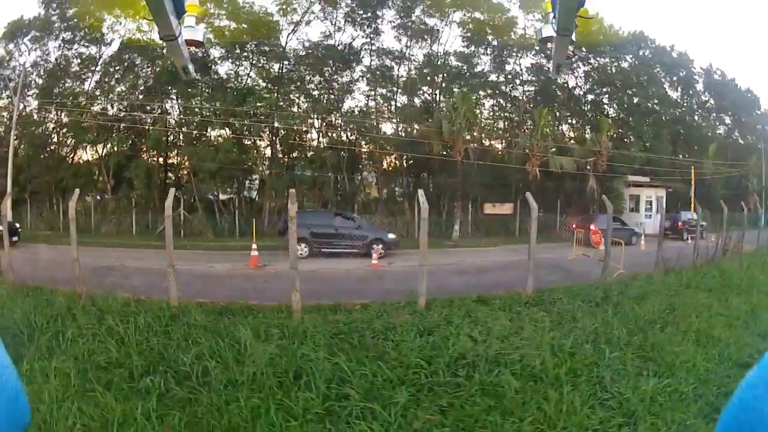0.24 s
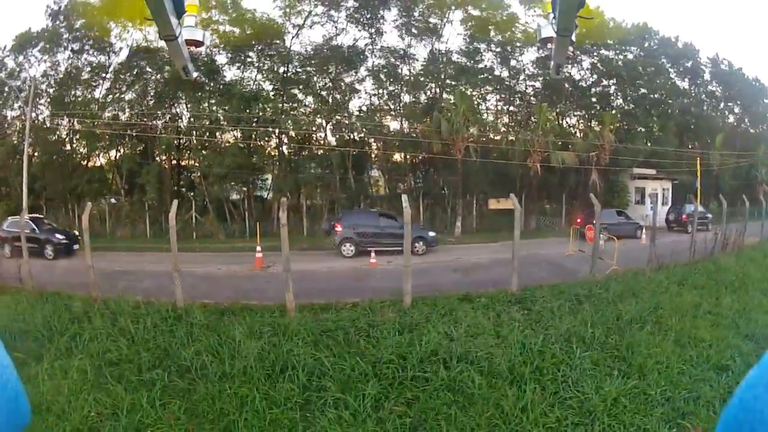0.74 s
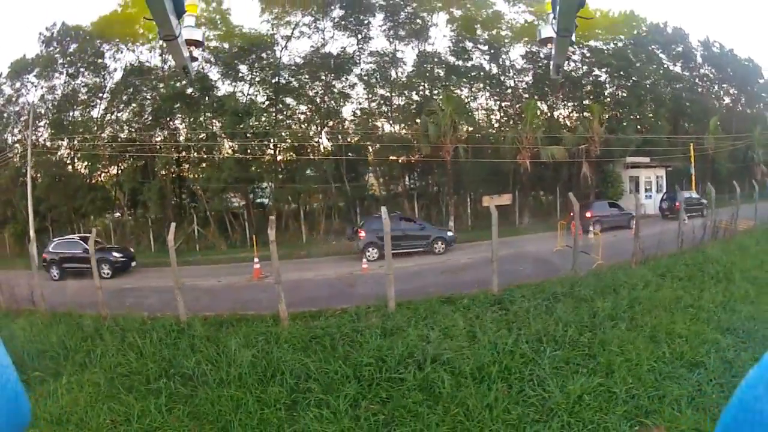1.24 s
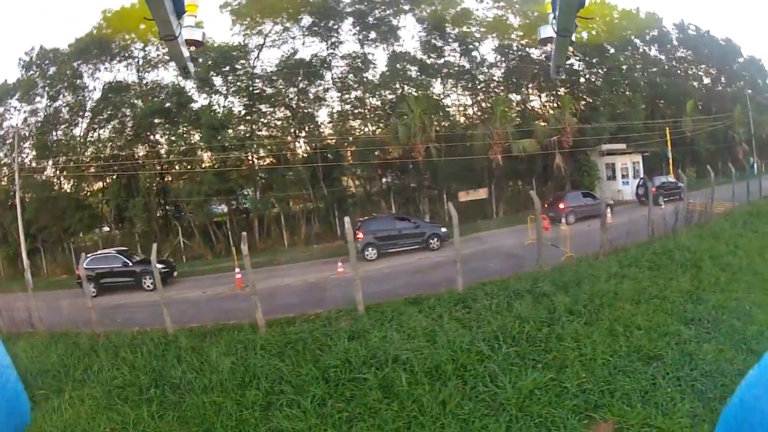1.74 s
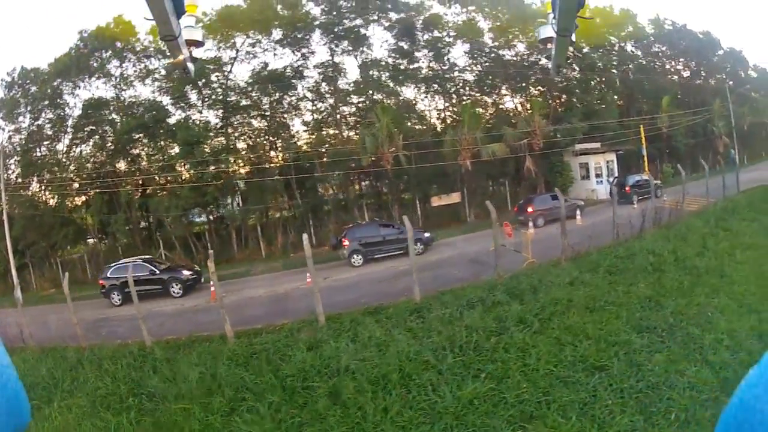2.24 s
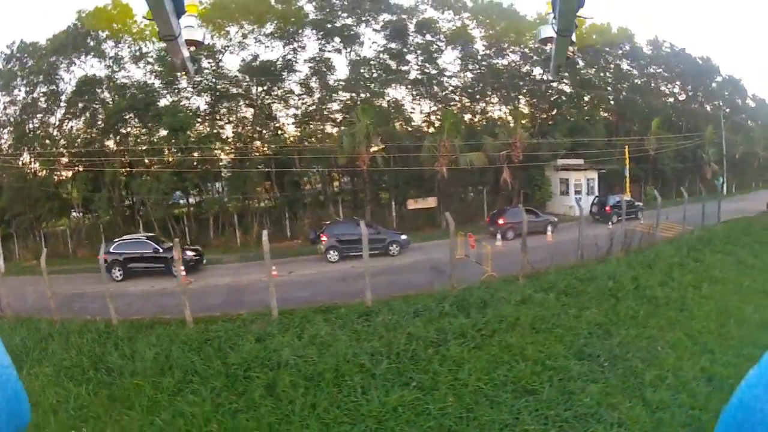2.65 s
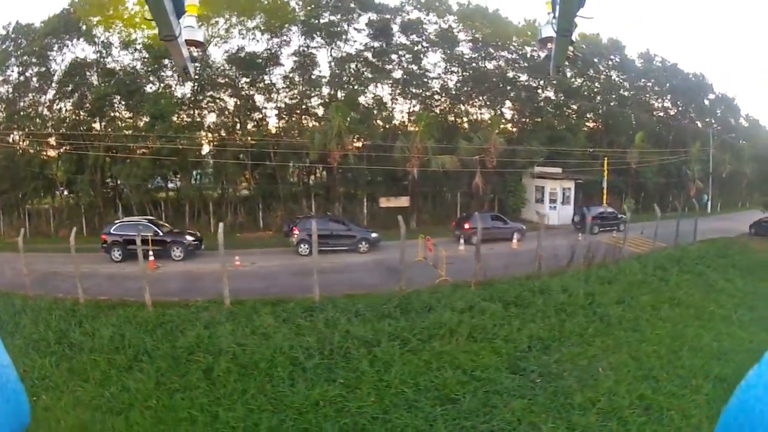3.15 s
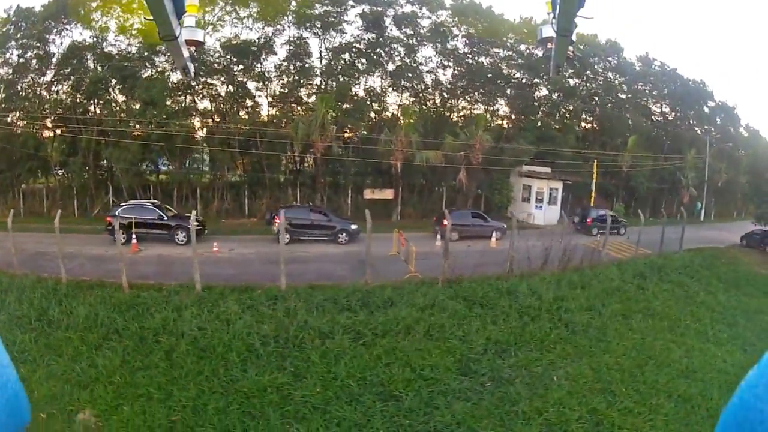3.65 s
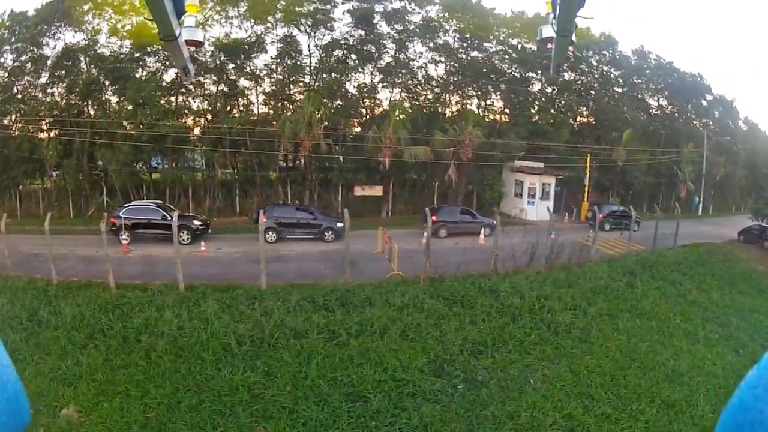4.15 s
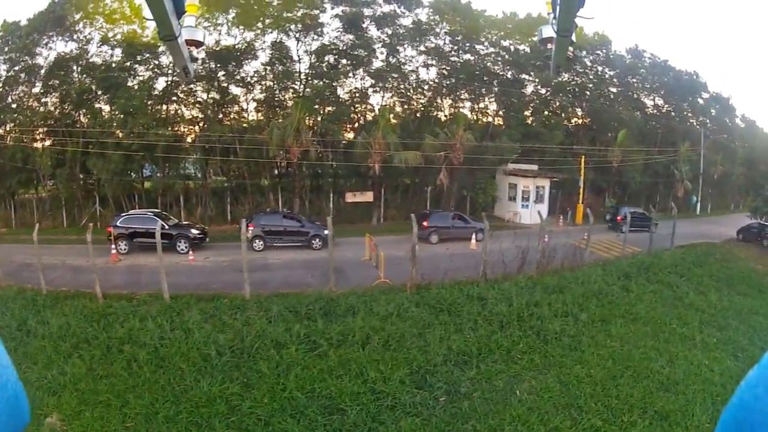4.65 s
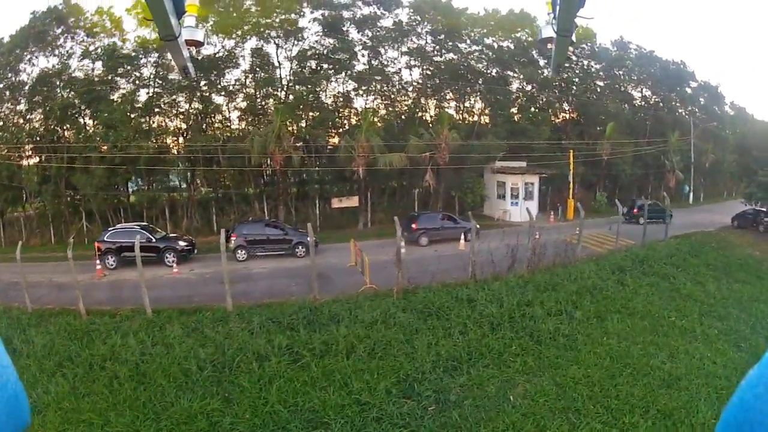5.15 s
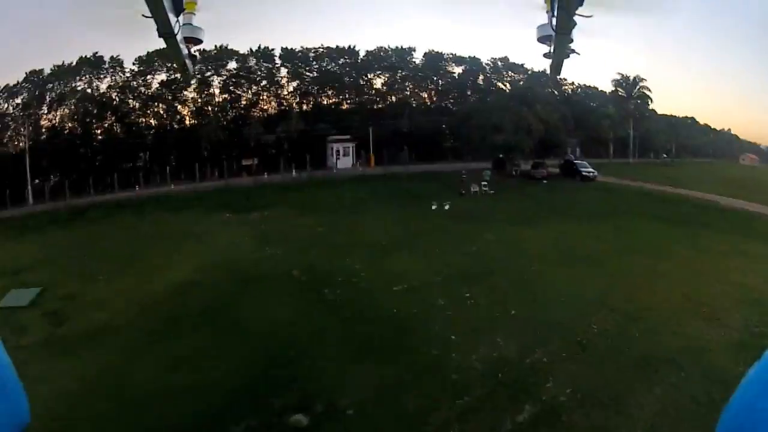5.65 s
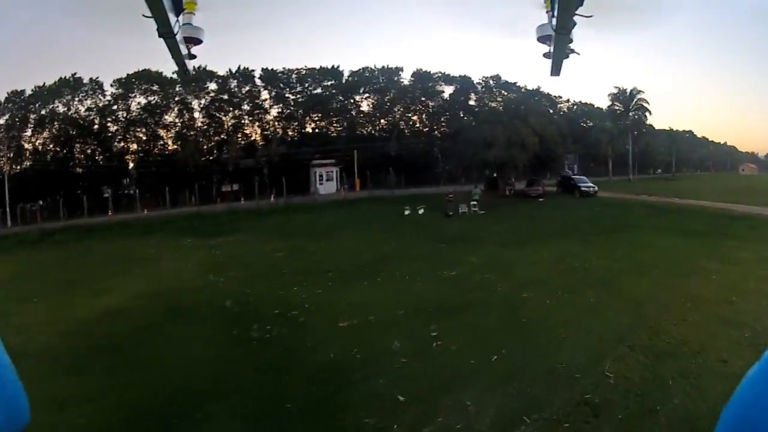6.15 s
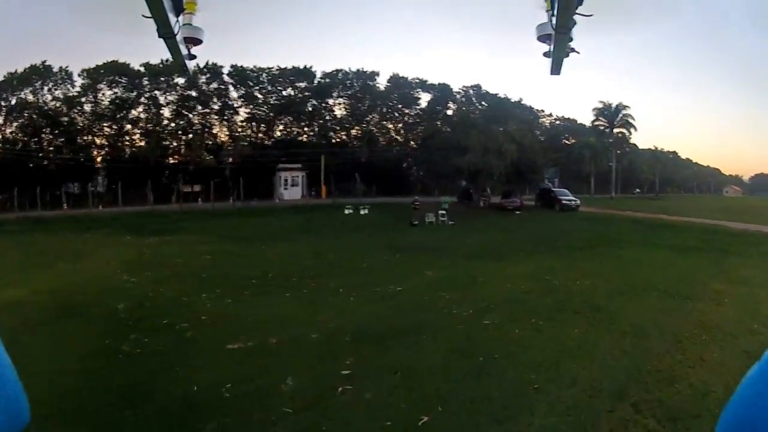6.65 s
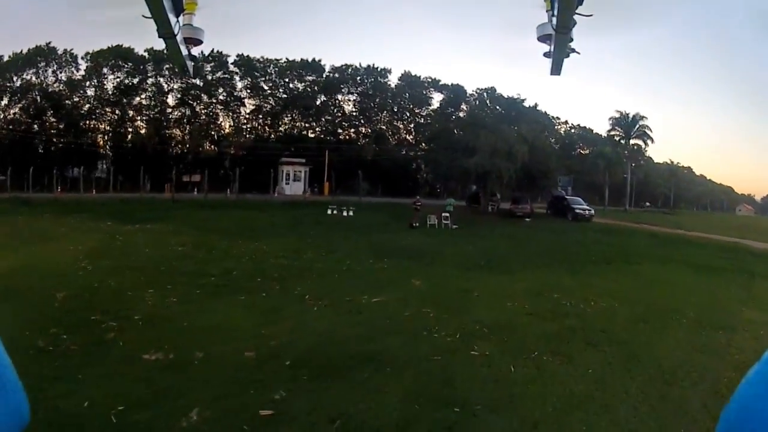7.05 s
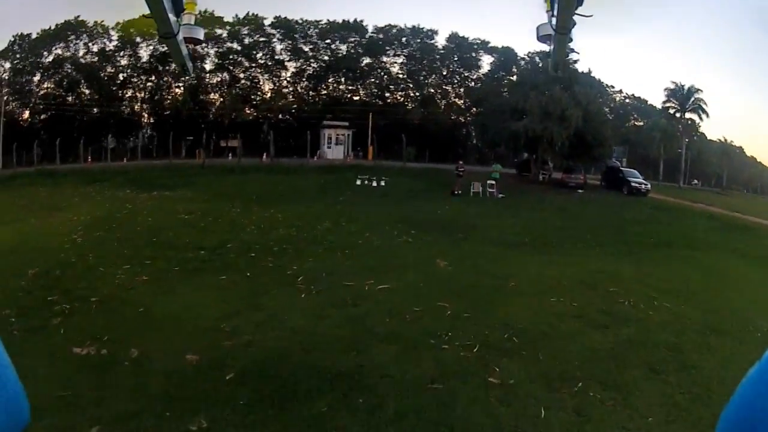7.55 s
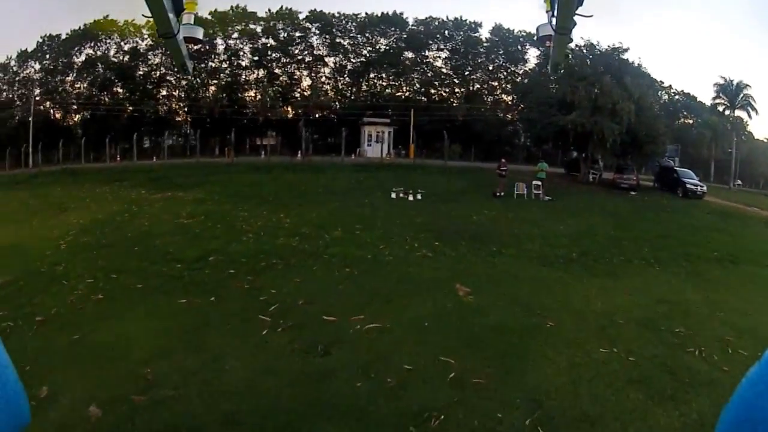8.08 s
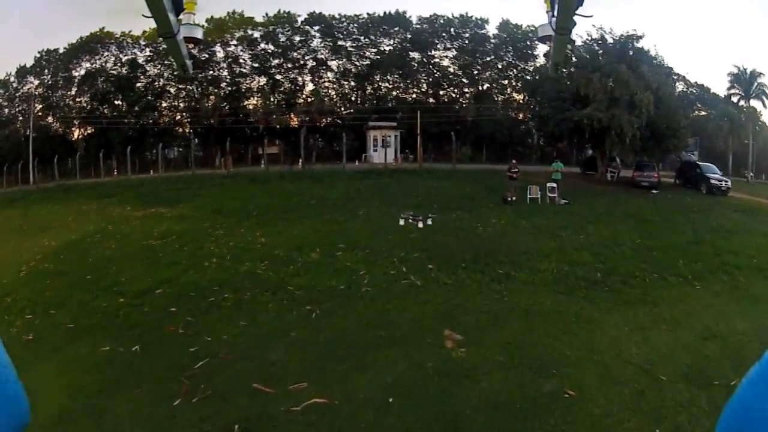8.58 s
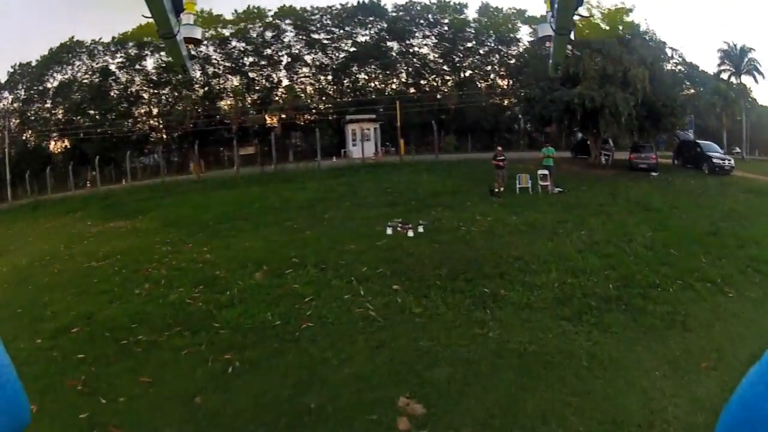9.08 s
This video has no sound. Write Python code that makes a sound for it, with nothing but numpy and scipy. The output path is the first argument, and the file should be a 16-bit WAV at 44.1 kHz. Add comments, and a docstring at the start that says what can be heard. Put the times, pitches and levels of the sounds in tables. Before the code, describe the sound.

Throughout about nine seconds, a camera hanging under a six-rotor drone hears its motors and propellers at close range, with no echo. Low hums around 120 to 175 Hz, with blade tones an octave higher, drift separately and beat in a restless, throbbing drone. Over them lies a gritty, fizzy buzz from the bearings, arms, camera case and small parts; faint wind rumble and hiss lie beneath. The buzz swells slightly near 1.3 and 5.2 s. Small bright ticks come around 0.6, 1.7 and 2.5 s, and dull low thumps near 1.5 and 2.7 s. At about 5.6 s a click marks an abrupt cut to another flight, whose case buzz is softer and rotor pitches spread differently. Thumps follow at 5.7, 6.0, 6.4, 6.9, 7.1, 7.5, 8.2 and 9.2 s, with a tick near 8.9 s. The level stays dense, compressed and slightly clipped, ending while still flying.

```python
"""A beating six-voice rotor hum under a fizzy buzz: a drone hovers over a field, heard from its slung camera.
Two flights follow each other. Each rotor hums at shaft and blade rate; trims shift the speeds, so they beat.
Bearing buzz and blade wash ring arms, camera case and small parts; wind noise, thumps and clicks lie beneath.
The camera levels, clips and holds its samples, which adds the fizz on top."""
import sys
import numpy as np
from scipy import signal
from scipy.fft import rfft, irfft, next_fast_len
from scipy.io import wavfile
from scipy.ndimage import uniform_filter1d

SR = 44100
rng = np.random.default_rng(int(sys.argv[2]) if len(sys.argv) > 2 else 0)


def waveform_to_disk(signal):
    """Save audio, clipped to [-1, 1], as 16-bit WAV at the path in sys.argv[1]."""
    frames = np.transpose(np.atleast_2d(signal))
    scaled = np.clip(frames, -1, 1) * 32767
    samples = np.round(scaled).astype(np.int16)
    wavfile.write(sys.argv[1], SR, samples)


N = 411012
TIME = np.arange(N) / SR
SECOND_FLIGHT_S = 5.565


def undb(db):
    """dB to amplitude ratio."""
    return 10 ** (np.asarray(db) / 20)


def unit(x):
    """Scale to rms 1."""
    return x / np.sqrt(np.mean(x ** 2))


def by_flight(first, second):
    """One value in the first flight, another in the second."""
    return np.where(TIME < SECOND_FLIGHT_S, first, second)


def curves(table):
    """Columns of a table, joined by straight lines in time."""
    s, *columns = np.transpose(table)
    return [np.interp(TIME, s, column) for column in columns]


def walk(rate_hz):
    """Smooth random wander of rms 1: random steps at rate_hz, averaged twice over one step."""
    step = max(int(SR / rate_hz), 1)
    stairs = np.repeat(rng.standard_normal(N // step + 1), step)
    ramps = uniform_filter1d(stairs, step)
    return unit(uniform_filter1d(ramps, step)[:N])


def sine(angle):
    """Sine at a random start phase."""
    return np.sin(angle + 2 * np.pi * rng.random())


def ring(x, modes):
    """Pass x through steep resonances whose powers add; rms 1."""
    size = next_fast_len(N)
    f = np.arange(size // 2 + 1) * SR / size + 1e-3  # offset avoids 0/0
    power = 0
    for hz, width_hz, db in modes:
        detuning = (f * f - hz * hz) / (f * width_hz)
        power = power + undb(db) ** 2 / (1 + detuning ** 2) ** 2
    return unit(irfft(rfft(x, size) * np.sqrt(power), size)[:N])


RUMBLE_DB, HISS_DB = (-62.5, -54), (-62, -58.5)  # (first flight, second flight)


def wind(churn_db=-39, flicker_db=3.5):
    """Downwash buffets the case and hisses on its edges; churned air fills in around the rotor tones."""
    rumble = ring(rng.standard_normal(N), [(28, 86, -1), (80, 150, 0)]) * undb(by_flight(*RUMBLE_DB))
    hiss_db = by_flight(*HISS_DB) + flicker_db * walk(80)
    hiss = ring(rng.standard_normal(N), [(4870, 3300, 0)]) * undb(hiss_db)
    churn = ring(rng.standard_normal(N), [(129, 52, -15), (194, 69, -1)]) * undb(churn_db)
    return rumble + hiss + churn


def strike(table, modes):
    """Each hit rings the modes as decaying sines; a wider mode dies sooner."""
    t = np.arange(SR // 10) / SR
    burst = np.zeros(len(t))
    for hz, width_hz, db in modes:
        burst += undb(db) * np.exp(-np.pi * width_hz * t) * np.sin(2 * np.pi * hz * t)
    hits = np.zeros(N)
    for s, peak_db in table:
        hits[int(s * SR)] += undb(peak_db)
    return signal.fftconvolve(hits, burst / np.abs(burst).max())[:N]


# short low thumps where the recorder overloads: t/s, peak level/dB
OVERLOAD_THUMPS = [(1.473, -15.5), (2.651, -20), (5.670, -18), (5.951, -11.5), (6.427, -15), (6.935, -17),
                   (7.086, -17), (7.548, -20), (8.232, -17), (9.171, -17.5)]
# short bright ticks, one at the cut between the two flights: t/s, peak level/dB
CLICKS = [(0.609, -21), (1.732, -19), (2.476, -17.5), (5.563, -15), (8.898, -16)]


def thumps_and_clicks():
    """Thumps are decaying low sines; clicks decay at the case and small-part resonances."""
    thumps = strike(OVERLOAD_THUMPS, [(276, 61, 6), (580, 130, -2.5), (727, 100, -14.5)])
    return thumps + strike(CLICKS, CASE_MODES + PART_MODES)


# resonances of the arms: f/Hz, width/Hz, level/dB
ARM_MODES = [(330, 108, 9.5), (419, 65, -2.5), (483, 48, -6.5), (607, 100, -7), (742, 89, -11)]
# resonances of the camera case: f/Hz, width/Hz, level/dB
CASE_MODES = [(1020, 123, -1.5), (1097, 210, -4), (1290, 174, 3.5), (1346, 290, -10)]
# resonances of the small stiff parts: f/Hz, width/Hz, level/dB
PART_MODES = [(1600, 200, -18), (1770, 170, 0), (1935, 326, 2.5), (2247, 260, -4.5), (2533, 215, 0.5),
              (2802, 144, -5), (3116, 180, -14.5), (3562, 330, -9), (3970, 500, -38)]
# brief louder airframe buzz: t/s, half length/s, arms gain/dB, case gain/dB, parts gain/dB
BUZZ_SWELLS = [(1.25, 0.37, -0.5, 0, 2), (5.2, 0.32, 2, 0.5, 0)]
# (first flight, second flight)
ARMS_DB, CASE_DB, PARTS_DB = (-35.5, -36.5), (-31, -35), (-37.5, -38.5)
SHAKE_DB_PER_HZ = 0.12  # per Hz of mean rotor speed


def airframe(buzz, wash, mean_hz, arms_wash_db=3, case_wash_db=6.0, parts_wash_db=4):
    """Buzz and wash shake arms, case and small parts, harder as mean rotor speed rises."""
    swells = sum(np.outer(gains_db, np.exp(-((TIME - s) / half_s) ** 2))
                 for s, half_s, *gains_db in BUZZ_SWELLS)
    speed_gain_db = SHAKE_DB_PER_HZ * (mean_hz - mean_hz.mean())
    base_db = [by_flight(*db) for db in (ARMS_DB, CASE_DB, PARTS_DB)]
    arms_db, case_db, parts_db = swells + speed_gain_db + base_db
    chatter_db = 0.8 * walk(75)  # camera jiggles in its mount
    parts_flicker_db = 0.7 * chatter_db + 1.4 * walk(60)
    arms = ring(buzz + undb(arms_wash_db) * wash, ARM_MODES) * undb(arms_db)
    case = ring(buzz + undb(case_wash_db) * wash, CASE_MODES) * undb(case_db + chatter_db)
    parts = ring(buzz + undb(parts_wash_db) * wash, PART_MODES) * undb(parts_db + parts_flicker_db)
    return arms + case + parts


# flight controller's two balancing trims: t/s, trim A/Hz, trim B/Hz
FIRST_TRIMS = [(0.0, 12, 15.5), (0.4, 6.5, 13), (0.79, 5, -1.72), (1.39, 8, -12), (1.98, 3.0, -2.5),
               (2.38, -0.5, -2), (2.58, 3, -6), (2.77, 1.12, -6), (2.97, -5, 2), (3.17, -4.0, 6.5),
               (3.96, -4.5, 4), (4.56, -4.0, -5.5), (4.96, -5.5, -8.5), (5.55, -12, 8)]
SECOND_TRIMS = [(5.58, -15.5, -0.5), (5.94, -12, -6.5), (6.29, -8.5, -1.6), (6.47, -6.5, 7.5),
                (6.65, 4.5, 6.5), (7.0, 13.0, -4.5), (7.36, 11.5, -9), (7.54, 7.5, 3.5), (8.07, -2.0, 14.5),
                (8.43, 3.5, -1.45), (8.96, -0.8, -8.5), (9.32, -0.15, 3.5)]
# row per rotor: hover speed f/Hz, share of trim A, share of trim B, hum level/dB at hover,
# blade tone level/dB before mount damping
FIRST_ROTORS = [(160.6, 0.99, 0, -29.5, -27), (155.8, .47, .25, -36.5, -35),
                (148.5, .52, .32, -26.5, -32.5), (140.33, .31, .96, -28.5, -28.5),
                (133.23, 0, 1, -32.5, -24.5), (141, .22, 0, -30, -36.5)]
SECOND_ROTORS = [(164.5, 0.039, -.12, -32, -31.5), (152.5, 1, 0, -23.5, -23),
                 (136.57, 1.09, .66, -32.5, -25.5), (133.15, 0.011, .83, -35, -28.5),
                 (121.84, 0.052, 1.15, -37, -30), (148.43, .32, .22, -30, -28.5)]
HUM_DB_PER_HZ = (0.19, 0.29)  # (first flight, second flight)
MOUNT_HZ, MOUNT_STEEPNESS = 318, 29.3  # soft mount damps blade tones above this


def mixer():
    """Per rotor (speed Hz, hum dB, blade dB): trims set its speed, speed sets its levels."""
    trim_a, trim_b = by_flight(curves(FIRST_TRIMS), curves(SECOND_TRIMS))
    drives = []
    for first, second in zip(FIRST_ROTORS, SECOND_ROTORS):
        hover_hz, share_a, share_b, hum_db, blade_db = map(by_flight, first, second)
        hz = hover_hz + share_a * trim_a + share_b * trim_b
        speed_gain_db = by_flight(*HUM_DB_PER_HZ) * (hz - hover_hz)
        damping_db = 10 * np.log10(1 + (2 * hz / MOUNT_HZ) ** (2 * MOUNT_STEEPNESS))
        drives.append((hz, hum_db + speed_gain_db, blade_db - damping_db))
    return drives


def bearing(turns, even_db, count=30):
    """Bumps repeat each shaft turn: orders 3 to count, even (blade) orders offset by even_db; rms 1."""
    orders = np.arange(count + 1)
    sizes = (orders > 2) * undb(even_db * (orders % 2 == 0))
    bumps = irfft(sizes * np.exp(2j * np.pi * rng.random(count + 1)), 1024)
    return unit(np.interp(turns % 1, np.linspace(0, 1, len(bumps)), bumps))


WOBBLE_HZ, WOBBLE_WIDTH_HZ = 211.7, 22.5  # mount sways most readily here
OVERTONES_DB = (-2, -7.5)  # wobble and overtones (first flight, second flight)


def rotor(hz, hum_db, blade_db, buzz_db, third_db, whine_db, jitter=.004, flutter_db=1.74, swell_db=1.36,
          wobble_db=-8.0, slow_wobble_db=-32, wash_depth=0.69):
    """One rotor: shaft and blade tones with overtones, bearing buzz, and air chopped at blade rate."""
    turns = np.cumsum(hz * (1 + jitter * walk(35))) / SR + 2 * rng.random()
    angle = 2 * np.pi * turns
    half, one_and_half, third, fourth, seventh = (sine(k * angle) for k in (.5, 1.5, 3, 4, 7))
    swell = swell_db * walk(4)  # lifts hum while lowering blade tone, and back
    hum = undb(hum_db + swell + flutter_db * walk(22)) * np.sin(angle)
    blade = undb(blade_db - swell + flutter_db * walk(30)) * sine(2 * angle)
    # mount wobbles once in two turns: half orders either side of the hum
    sway = one_and_half / np.hypot(1, (1.545 * hz - WOBBLE_HZ) / WOBBLE_WIDTH_HZ)
    wobble = undb(wobble_db) * sway + undb(slow_wobble_db) * half
    wobble *= undb(hum_db + 3.9 * walk(9))
    # orders 3 and 4 peak near arm resonances, order 7 near a case resonance
    third = third / np.hypot(1, (3 * hz - 388) / 18)
    whine = fourth / np.hypot(1, (4 * hz - 580) / 17)
    whine += .85 * seventh / np.hypot(1, (7 * hz - 1015) / 24)
    overtones = (undb(third_db) * third + undb(whine_db) * whine) * undb(2.3 * walk(20))
    tones = hum + blade + (wobble + overtones) * undb(by_flight(*OVERTONES_DB))
    buzz = bearing(turns + 0.013 * walk(70), even_db=-1.0) * undb(buzz_db + 1.53 * walk(20))
    wash = rng.standard_normal(N) * (1 + wash_depth * np.sin(2 * angle))
    return np.sqrt(2) * tones, buzz, wash


# row per motor: relative bearing buzz level/dB, third order level/dB, whine level/dB
MOTOR_VOICES = [(-3.5, -40, -56), (-2, -55, -51), (-2, -45, -55.5), (-0.5, -42, -41.5), (-2, -46, -54),
                (-1.5, -50, -64)]


def scene():
    """Wind, thumps and clicks, the shaken airframe and the six rotors that shake it."""
    drives = mixer()
    rotors = [rotor(*drive, *motor) for drive, motor in zip(drives, MOTOR_VOICES)]
    tones, buzz, wash = np.sum(rotors, axis=0)
    mean_hz = np.mean([hz for hz, _, _ in drives], axis=0)
    shaken = airframe(unit(buzz), unit(wash), mean_hz)
    return (wind() + thumps_and_clicks() + shaken + tones)[None]


CAMERA_HZ, TOP_HZ = 12000, 15250  # sample rate, low-pass edge


def record(dry, ceiling_db=-17.0, settle_s=0.05, clip=.315):
    """Camera turns swells down, clips, and holds slow samples: faint mirror images about CAMERA_HZ."""
    keep = np.exp(-1 / (settle_s * SR))
    power = signal.lfilter([1 - keep], [1, -keep], dry ** 2, zi=[[np.mean(dry ** 2)]])[0]
    levelled = dry / np.maximum(1, np.sqrt(power) / undb(ceiling_db))
    slow = np.clip(signal.resample_poly(levelled, CAMERA_HZ, SR, axis=1), -clip, clip)
    steps = np.repeat(slow, 4, axis=1)
    held = signal.resample_poly(steps, SR, 4 * CAMERA_HZ, axis=1)[:, :N]
    return signal.sosfilt(signal.ellip(10, .1, 70, TOP_HZ, fs=SR, output="sos"), held)


dry = scene()
out = record(dry)
waveform_to_disk(out)
```